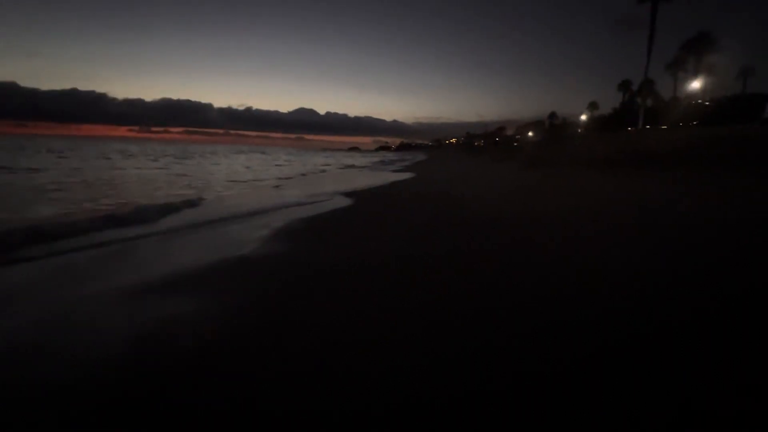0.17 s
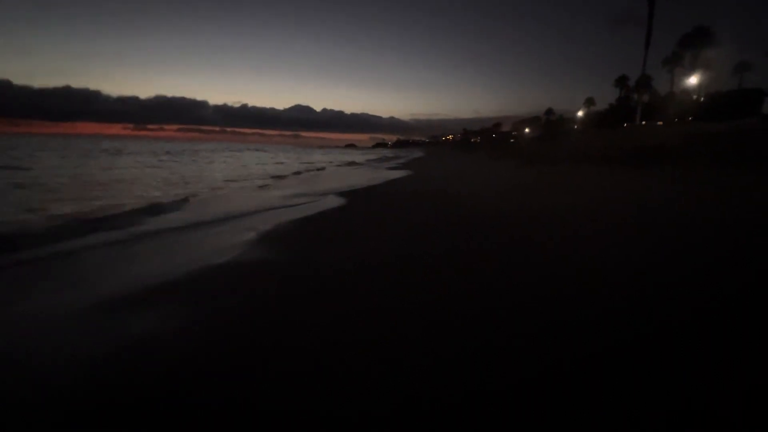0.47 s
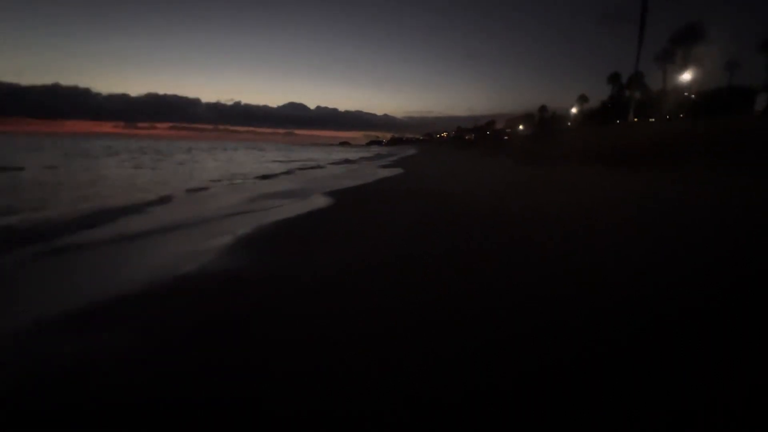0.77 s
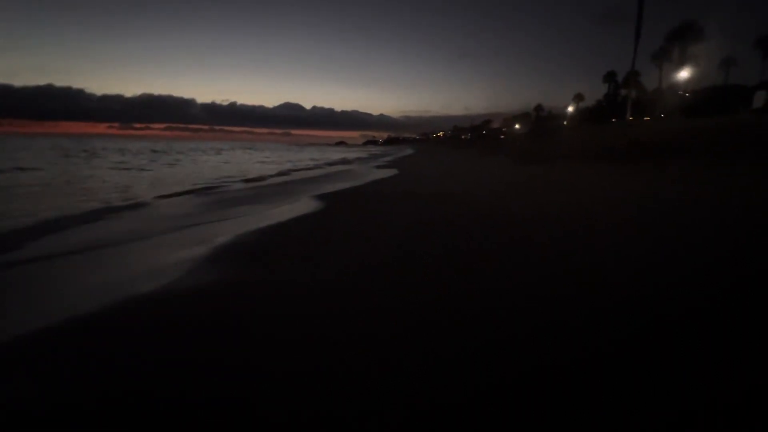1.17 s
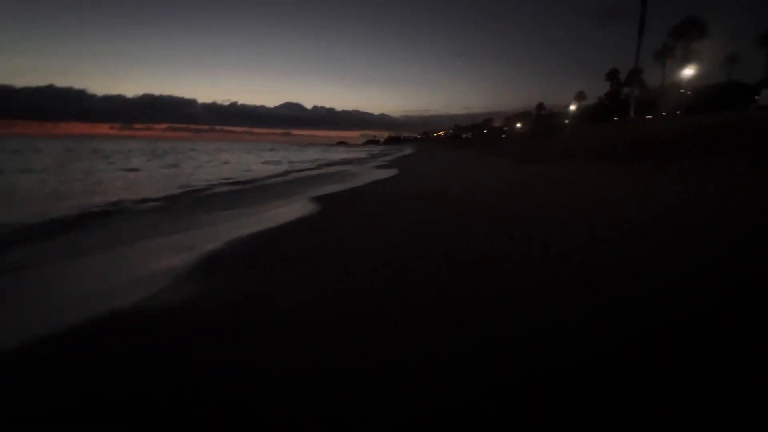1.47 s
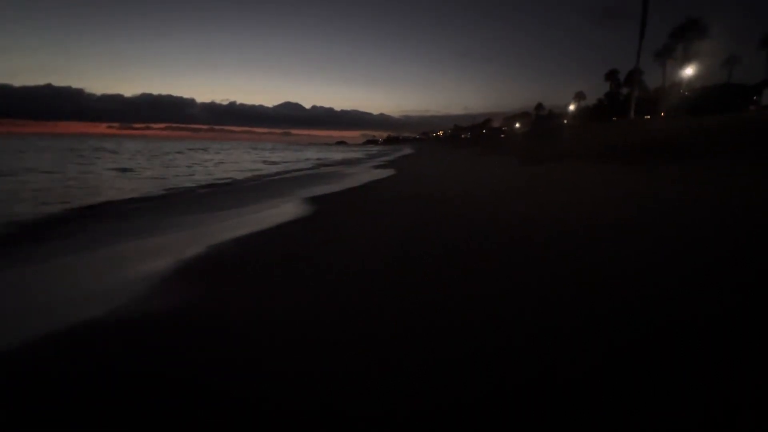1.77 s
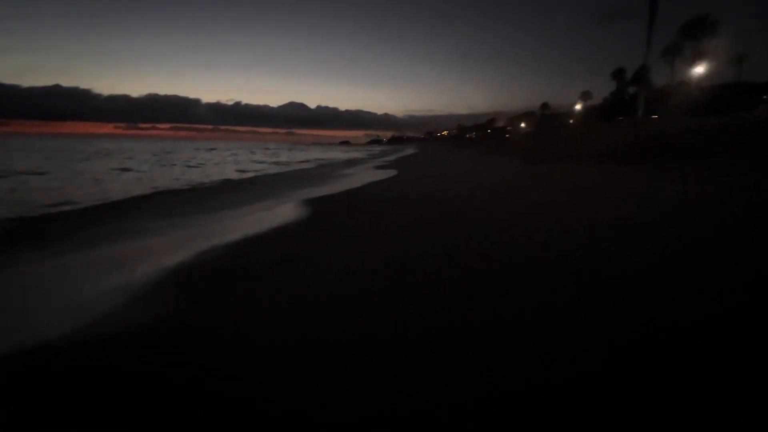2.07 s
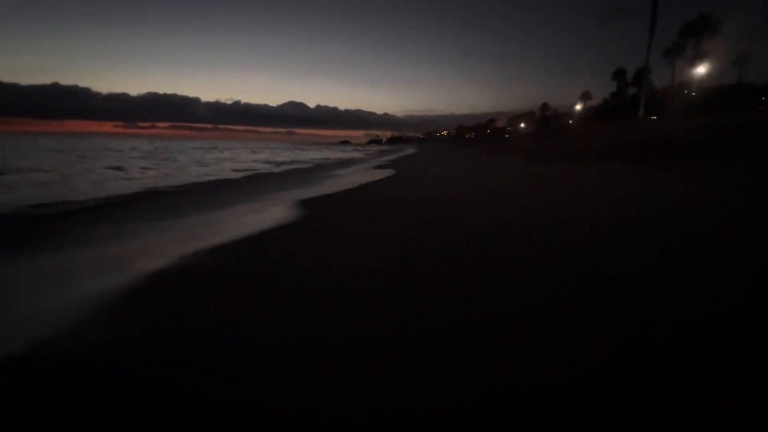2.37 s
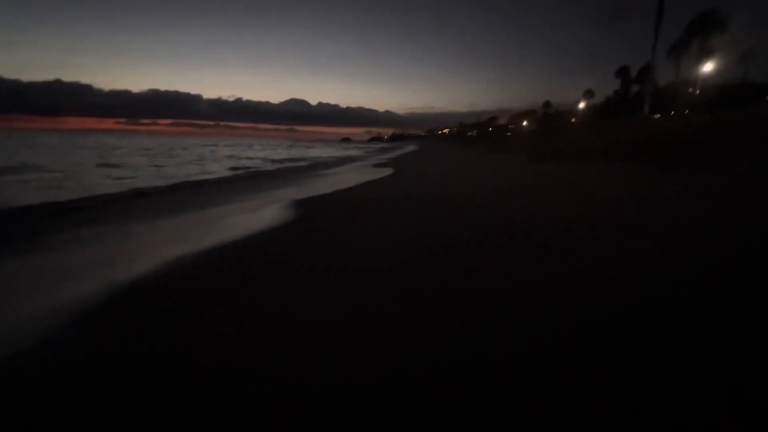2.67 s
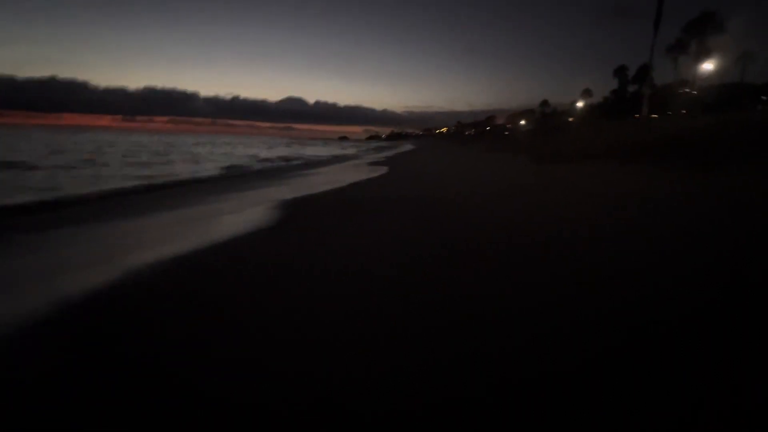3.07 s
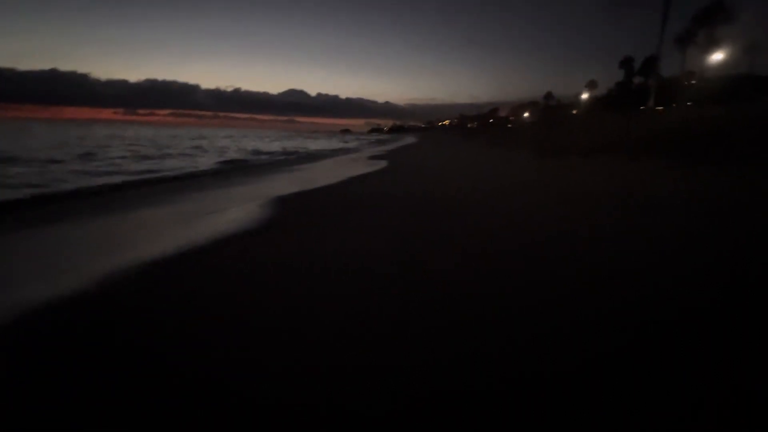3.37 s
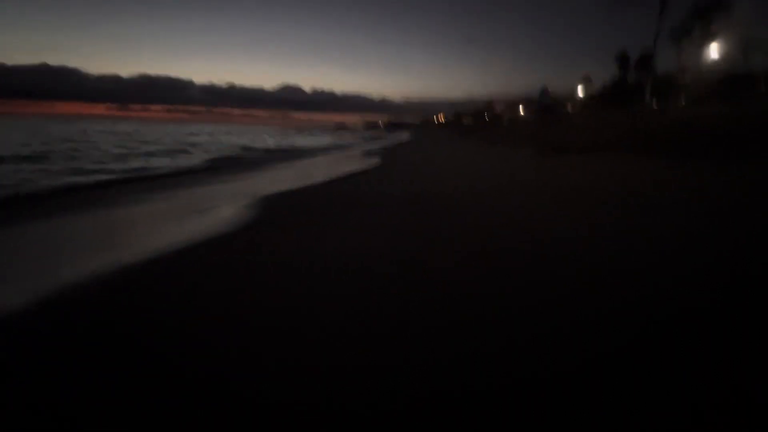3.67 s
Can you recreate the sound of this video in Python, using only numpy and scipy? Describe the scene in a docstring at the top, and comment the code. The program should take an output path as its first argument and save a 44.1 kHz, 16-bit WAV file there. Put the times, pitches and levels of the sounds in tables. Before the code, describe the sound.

Small waves wash over a sandy beach, foam hissing, with low gusty wind rumble

```python
"""Small waves on a sandy beach

Gusty wind rumbles as filtered noise, with brief pitched booms from the strongest eddies.
Breakers roar and swash rushes (noise); ringing bubbles splash, foam hisses and crackles (noise, impulses).
A few bubbles pop close by (decaying noise). The water lies left of a hand-held recorder with two
microphones: the surf reaches the left one first."""
import sys
import numpy as np
from scipy import signal
from scipy.fft import rfft, irfft
from scipy.io import wavfile
from scipy.ndimage import uniform_filter1d

SR = 44100
rng = np.random.default_rng(int(sys.argv[2]) if len(sys.argv) > 2 else 0)


def generate_wav(sig):
    """Save sig (samples, or channels by samples) to the path in sys.argv[1] as 16-bit PCM at SR."""
    pcm = np.round(np.clip(np.atleast_2d(sig).T, -1, 1) * 32767).astype(np.int16)
    wavfile.write(sys.argv[1], SR, pcm)


N = 168021  # samples

# Levels over time, before each layer's trim: t/s, level/dB
GUST_LEVEL = [(0, -34), (.13, -33.5), (.22, -33.5), (.31, -33.5), (.5, -35.5), (.62, -36), (.75, -38),
              (1.0, -37.5), (1.33, -36), (1.55, -39.5), (1.7, -37.5), (1.95, -36.5), (2.07, -39),
              (2.22, -36), (2.32, -38), (2.44, -36), (2.62, -37.5), (2.88, -40.5), (3.3, -41),
              (3.81, -38.5)]
BUFFET_LEVEL = [(0, -34.5), (.28, -35), (.39, -57), (.62, -61), (.78, -39), (1.0, -55), (1.14, -45),
                (1.3, -52), (1.6, -42), (1.8, -42), (2.07, -56), (2.3, -41), (2.58, -46), (2.73, -55),
                (3.0, -45), (3.15, -53), (3.81, -43)]
ROAR_LEVEL = [(0, -42), (.4, -42.5), (.7, -43), (.8, -42.5), (1.0, -43.5), (1.55, -44), (2.05, -41),
              (2.45, -43.5), (2.9, -43.5), (3.3, -43.5), (3.55, -41.5), (3.81, -45.5)]
SWASH_LEVEL = [(0, -43), (.3, -44.5), (.5, -43), (.7, -47), (.92, -44), (1.25, -43.4), (1.5, -46),
               (1.88, -47.5), (2.03, -46.2), (2.15, -46.7), (2.35, -44.5), (2.8, -46), (3.0, -45),
               (3.25, -46.5), (3.5, -42.5), (3.81, -42.5)]  # also drives the splashes
FOAM_LEVEL = [(0, -44.5), (.22, -48), (.7, -47.5), (1.02, -47), (1.38, -49.5), (1.55, -49.5), (1.68, -53.5),
              (2.04, -50.5), (2.22, -54), (2.38, -50.5), (2.65, -51.5), (2.85, -54), (3.0, -54.5),
              (3.2, -57), (3.55, -54.5), (3.81, -58)]  # also drives the crackle
SPRAY_LEVEL = [(0, -46), (.25, -50), (.45, -48.5), (1.0, -55), (1.25, -50), (1.7, -53.5), (2.15, -50.5),
               (2.4, -50), (2.75, -53), (2.9, -52.5), (3.25, -55), (3.55, -51.5), (3.81, -52.5)]
# Relative spectra: f/Hz, density/dB per Hz
GUST_COLOUR = [(40, -33), (80, -2), (130, -1.5), (220, -0.5), (310, -2.5), (430, -7), (600, -14.5),
               (1200, -72)]
BUFFET_COLOUR = [(15, -24), (32, -31), (48, 3), (70, 3.5), (105, -5), (250, -71)]
ROAR_COLOUR = [(100, -15), (300, -8), (500, -1.5), (780, 0), (1030, -1.5), (1300, -3), (1800, -13.5),
               (3000, -43), (6000, -49)]
SWASH_COLOUR = [(500, -8.5), (1100, -4), (1550, 2.5), (2100, -3.5), (2900, -10), (3600, -17), (5000, -23),
                (10000, -36.5)]
SPLASH_COLOUR = [(800, -5), (1600, 0), (3400, 5.5), (5000, -23), (7000, -14)]
FOAM_COLOUR = [(1000, -12), (2500, 0.5), (3600, -1), (5000, 1.5), (6000, -3), (7000, -9), (9000, -7),
               (15000, -59)]
SPRAY_COLOUR = [(5000, -25), (7200, -7), (8200, .5), (9700, -.5), (10800, -1), (12300, -8), (15000, -8),
                (15800, -12)]
CRACKLE_COLOUR = [(500, -10), (1500, 3), (3000, 1), (5000, -4), (7000, -12), (14000, -21)]
POP_COLOUR = [(2000, -12), (6000, -5), (14000, -3), (18000, -20)]
# Strong wind eddies: centre t/s, length/s, f/Hz, level before pan/dB
EDDIES = [(0.008, 0.056, 116, -29.5), (0.07, .08, 298, -31.5), (0.237, 0.11, 209, -35.5),
          (0.33, .1, 227, -32), (.40, 0.087, 322, -36), (1.442, 0.062, 282, -36.5),
          (1.609, 0.069, 157, -33.5), (1.768, 0.064, 270, -40), (2.22, .07, 135, -35),
          (2.45, 0.056, 125, -35.5), (2.543, 0.05, 260, -34.5), (2.58, .06, 131, -38),
          (2.95, 0.19, 48, -43)]
# Single bubble bursts: t/s, nominal peak/dB
POPS = [(.8387, -46), (1.1473, -47), (1.5459, -48), (2.04, -45), (2.6665, -49), (2.8943, -48),
        (3.1604, -44.5)]
# Phase lead of the left microphone for surf: f/Hz, lead/rad
SURF_LEAD = [(200, 1.2), (550, 2.3), (1050, 2.6), (1300, 3.3), (2200, 4.6), (3000, 7.7), (4000, 10.7),
             (4900, 12.6), (5500, 12.6), (6300, 16), (7300, 18.8), (8400, 22), (9400, 25), (10300, 28),
             (11300, 28.6), (12200, 31.4)]
# Likeness of surf at the two microphones: f/Hz, likeness/0-1
SURF_LIKENESS = [(300, 0.74), (600, 0.81), (850, 0.92), (1050, 0.39), (1900, 0.57), (2600, 0.18),
                 (3500, 0.62), (5000, 0.37), (6000, 0.12), (9300, 0.1), (10500, 1), (15000, 0.79)]
# Surf level, left minus right: f/Hz, difference/dB
SURF_PAN = [(300, 3.5), (600, 1), (800, 4.5), (1050, 4), (1200, 1.5), (1550, 7), (2000, 1), (3400, 2.5),
            (4200, 7.5), (5000, 12), (5700, 11), (6900, -4), (8100, 4), (9300, -1.5), (10500, -1)]
# Gliding hollow in the surf's tone: t/s, centre f/Hz, gain/dB
HOLLOW = [(.45, 1100, -0.5), (.9, 1180, -8.5), (1.35, 1210, -4), (1.9, 1390, -4.5)]
# Narrow treble dips: f/Hz, half-width/Hz, mean gain/dB
TREBLE_DIPS = [(5335, 120, -10.5), (7600, 220, -10)]

GUST_TRIM_DB, BUFFET_TRIM_DB = 1, -3.5
ROAR_TRIM_DB, SWASH_TRIM_DB, SPLASH_TRIM_DB = 7, 4, -9
FOAM_TRIM_DB, SPRAY_TRIM_DB, CRACKLE_TRIM_DB = 3.5, -2.5, -9
GUST_FLUTTER_DB, SURF_FLUTTER_DB, FOAM_FLUTTER_DB, SPRAY_FLUTTER_DB = 1.17, 0.38, 0.5, 1.0
FLUTTER_HZ = 14
GUST_LIKENESS, BUFFET_LIKENESS, GUST_PAN_DB, BUFFET_PAN_DB = 0.91, 0.52, 3.5, 1
EDDY_HALF_WIDTH_OCTAVES = 0.41
SPLASHES_PER_S, SPLASH_LOW_HZ, SPLASH_HIGH_HZ = 420, 900, 5500
SPLASH_DECAY_CYCLES, SPLASH_GLIDE, SPLASH_SCATTER_DB = 7, .12, 3.0
FIZZ_PER_S, FIZZ_SCATTER_DB, FIZZ_RE_HISS_DB = 2500, 4, -4
HOLLOW_HALF_WIDTH_OCTAVES = 0.25
PATCH_DB, PATCH_S, PATCH_HZ = 1.15, .09, 500
CRACKLES_PER_S, CRACKLE_SCATTER_DB = 160, 3.0
POP_DECAY_S = .008
DIP_WAVER_DB, DIP_WAVER_HZ = 3, 9
TOP_HZ = 15500


def undb(db):
    """Decibels to gain."""
    return 10 ** (np.asarray(db) / 20)


def unit(x):
    """Scale to rms 1."""
    return x / np.sqrt(np.mean(x ** 2))


def bins():
    """Frequency of each spectral bin, floored at 1 Hz."""
    return np.maximum(np.arange(N // 2 + 1) * SR / N, 1)


def across(points):
    """Interpolate (Hz, value) over log frequency."""
    hz, value = np.array(points, float).T
    return np.interp(np.log(bins()), np.log(hz), value)


def along(points):
    """Interpolate (s, value) over time."""
    return np.interp(np.arange(N) / SR, *np.array(points, float).T)


def walk(rate_hz):
    """Random levels held 1 / rate_hz and smoothed twice; spread near 1."""
    step = (np.arange(N) * rate_hz / SR).astype(int) % 1024
    held = rng.standard_normal(1024)[step]
    width = int(SR / rate_hz)
    return 1.3 * uniform_filter1d(uniform_filter1d(held, width), width)


def noise():
    """Two unrelated white noises."""
    return rng.standard_normal((2, N))


def pair(two, colour, likeness, pan_db, lead_rad=0):
    """Mix two signals into coloured left and right, joint rms 1; unrelated inputs give the likeness."""
    a, b = rfft(two)
    c = np.clip(likeness, 0, 1)
    mid, side = np.sqrt(1 + c) * a, np.sqrt(1 - c) * b
    left = (mid + side) * undb(pan_db / 2)
    right = (mid - side) * undb(-pan_db / 2) * np.exp(-1j * lead_rad)
    return unit(irfft(np.array([left, right]) * undb(across(colour)), N))


def from_sea(two, colour):
    """Spread along the waterline on the left by phase, level and likeness per frequency."""
    return pair(two, colour, across(SURF_LIKENESS), across(SURF_PAN), across(SURF_LEAD))


def wind():
    """Eddies rumble and flutter at the microphones over deeper buffeting."""
    rumble = pair(noise(), GUST_COLOUR, GUST_LIKENESS, GUST_PAN_DB)
    rumble_db = along(GUST_LEVEL) + GUST_TRIM_DB + GUST_FLUTTER_DB * walk(FLUTTER_HZ)
    buffet = pair(noise(), BUFFET_COLOUR, BUFFET_LIKENESS, BUFFET_PAN_DB)
    buffet_db = along(BUFFET_LEVEL) + BUFFET_TRIM_DB
    return rumble * undb(rumble_db) + buffet * undb(buffet_db)


def waves():
    """Clouds of large bubbles roar in the breakers; smaller ones rush in the swash."""
    roar_db = along(ROAR_LEVEL) + ROAR_TRIM_DB + SURF_FLUTTER_DB * walk(FLUTTER_HZ)
    swash_db = along(SWASH_LEVEL) + SWASH_TRIM_DB + SURF_FLUTTER_DB * walk(FLUTTER_HZ)
    roar = from_sea(noise(), ROAR_COLOUR) * undb(roar_db)
    swash = from_sea(noise(), SWASH_COLOUR) * undb(swash_db)
    return roar + swash


def bubbles():
    """Bubbles of random size ring as decaying sines, rising in pitch."""
    out = np.zeros(N + SR)  # room for the last tails
    for at, size, strength in rng.random((int(SPLASHES_PER_S * N / SR), 3)):
        hz = SPLASH_LOW_HZ * (SPLASH_HIGH_HZ / SPLASH_LOW_HZ) ** size
        samples = np.arange(int(4 * SPLASH_DECAY_CYCLES * SR / hz))
        age = samples * hz / SR / SPLASH_DECAY_CYCLES  # in decay times
        cycles = SPLASH_DECAY_CYCLES * age * (1 + SPLASH_GLIDE * age / 4)
        ring = np.exp(-age) * np.sin(2 * np.pi * cycles)
        level_db = -SPLASH_SCATTER_DB * np.log(max(strength, .01))
        start = int(at * N)
        out[start:start + len(ring)] += ring * undb(level_db)
    return out[:N]


def splashes():
    """Ringing bubbles splash and gurgle at the edge of the swash."""
    ringing = from_sea(np.array([bubbles(), bubbles()]), SPLASH_COLOUR)
    return ringing * undb(along(SWASH_LEVEL) + SPLASH_TRIM_DB)


def fizzing():
    """Countless far bursts merge into white hiss; nearer ones stand out as single-sample clicks."""
    bursts = (rng.random((2, N)) < FIZZ_PER_S / SR) * np.sign(noise())
    scatter = np.minimum(rng.exponential(size=(2, N)), 6)
    clicks = unit(bursts * undb(FIZZ_SCATTER_DB * scatter))
    return noise() + undb(FIZZ_RE_HISS_DB) * clicks


def foam():
    """Bursting foam hisses over the sand, with finer spray above it."""
    hiss_db = along(FOAM_LEVEL) + FOAM_TRIM_DB + FOAM_FLUTTER_DB * walk(FLUTTER_HZ)
    spray_db = along(SPRAY_LEVEL) + SPRAY_TRIM_DB + SPRAY_FLUTTER_DB * walk(FLUTTER_HZ)
    hiss = from_sea(fizzing(), FOAM_COLOUR) * undb(hiss_db)
    spray = from_sea(fizzing(), SPRAY_COLOUR) * undb(spray_db)
    return hiss + spray


def churn(x):
    """Patches of the water's tone swell and fade by chance while a hollow glides upward through it."""
    hz, t, z = signal.stft(x, SR, nperseg=512)
    at, centre_hz, gain_db = np.array(HOLLOW, float).T
    octaves = np.log2((hz[:, None] + 1) / np.interp(t, at, centre_hz))
    hollow_db = np.interp(t, at, gain_db) * np.exp(-(octaves / HOLLOW_HALF_WIDTH_OCTAVES) ** 2)
    patches = rng.standard_normal(z.shape[1:])  # frequency by time, same for both ears
    patches = uniform_filter1d(patches, int(PATCH_S / t[1]), axis=1)
    patches = unit(uniform_filter1d(patches, int(PATCH_HZ / hz[1]), axis=0))
    return signal.istft(z * undb(hollow_db + PATCH_DB * patches), SR)[1][:, :N]


def crackle():
    """Close foam bubbles burst as sparse sharp specks, one train in both ears, stronger at left."""
    bursts = (rng.random(N) < CRACKLES_PER_S / SR) * np.sign(rng.standard_normal(N))
    scatter = np.minimum(rng.exponential(size=N), 3)
    specks = bursts * undb(CRACKLE_SCATTER_DB * scatter)
    placed = pair(np.array([specks, specks]), CRACKLE_COLOUR, 0.43, 2)
    return placed * undb(along(FOAM_LEVEL) + CRACKLE_TRIM_DB)


def eddies():
    """The strongest eddies boom briefly: noise in a band around each one's pitch, swelling and fading."""
    t, out = np.arange(N) / SR, 0
    for at, length_s, hz, db in EDDIES:
        band = np.exp(-(np.log2(bins() / hz) / EDDY_HALF_WIDTH_OCTAVES) ** 2)
        swell = np.exp(-(2 * (t - at) / length_s) ** 2)
        boom = irfft(rfft(rng.standard_normal(N)) * band, N) * swell
        # level is the rms at the top of the swell
        out = out + unit(boom) * np.sqrt(np.mean(swell ** 2)) * undb(db)
    return out * undb(np.array([[1], [-1]]) * GUST_PAN_DB / 2)


def pops():
    """Single bubbles burst on the wet sand: thin ticks of decaying noise."""
    t = np.arange(N) / SR
    burst = 0
    for at, db in POPS:
        burst = burst + undb(db) * (t >= at) * np.exp(-np.abs(t - at) / POP_DECAY_S)
    return burst * pair(noise(), POP_COLOUR, 0.48, 0) / 2  # noise peaks taken as twice rms


def scene():
    """Wind, waves and foam in the open air."""
    water = churn(waves() + splashes() + foam())
    return wind() + eddies() + water + crackle() + pops()


def record(dry):
    """Two narrow treble dips waver in depth; the recorder cuts the top with a steep low-pass."""
    heard = dry
    for hz, half_width_hz, db in TREBLE_DIPS:
        shape = np.exp(-((bins() - hz) / half_width_hz) ** 4)
        band = irfft(rfft(dry) * shape, N)
        heard = heard - band * (1 - undb(db + DIP_WAVER_DB * walk(DIP_WAVER_HZ)))
    low_pass = signal.ellip(10, .2, 80, TOP_HZ, fs=SR, output="sos")
    return signal.sosfilt(low_pass, heard)


dry = scene()
out = record(dry)
generate_wav(out)
```